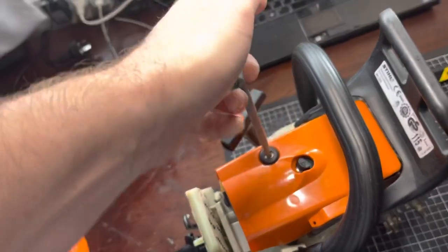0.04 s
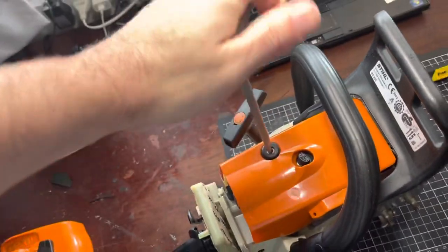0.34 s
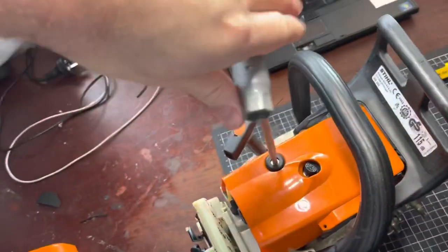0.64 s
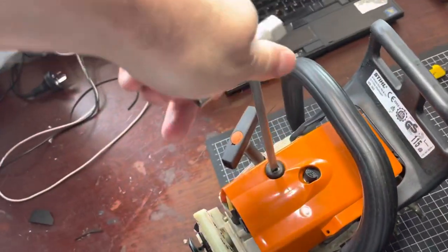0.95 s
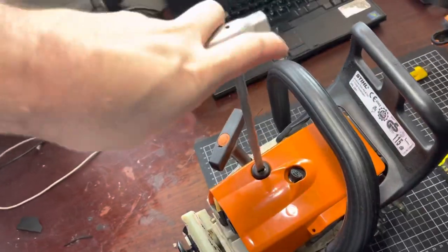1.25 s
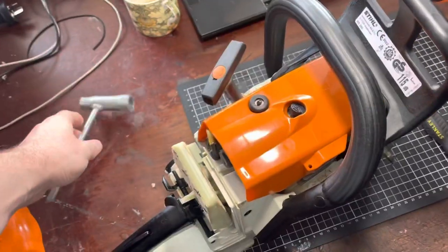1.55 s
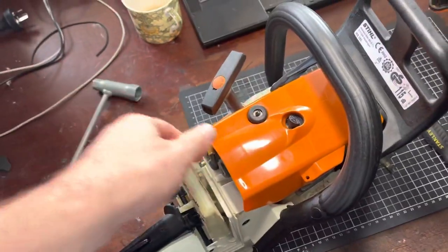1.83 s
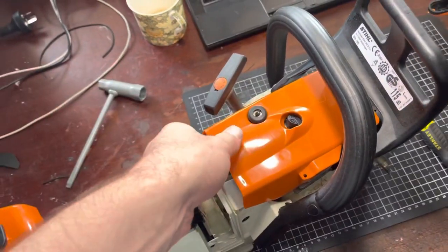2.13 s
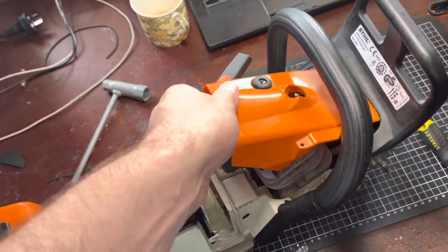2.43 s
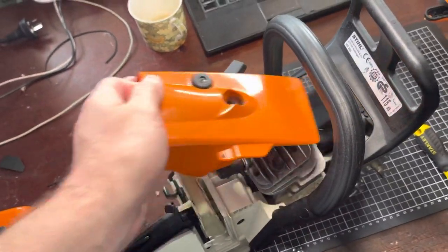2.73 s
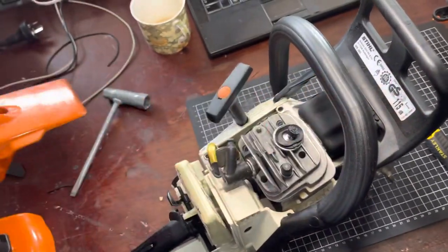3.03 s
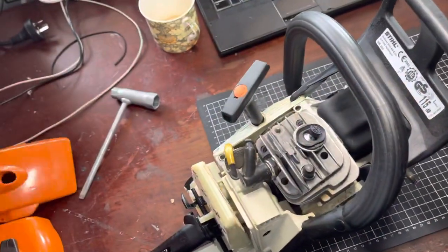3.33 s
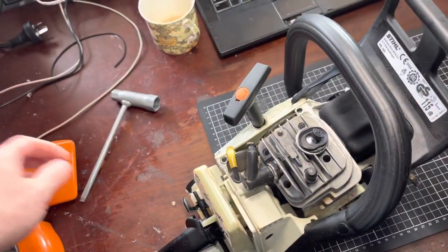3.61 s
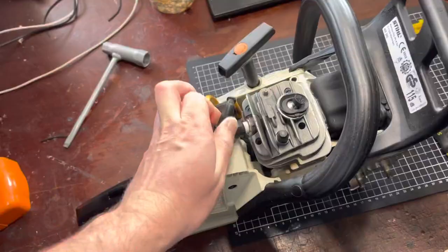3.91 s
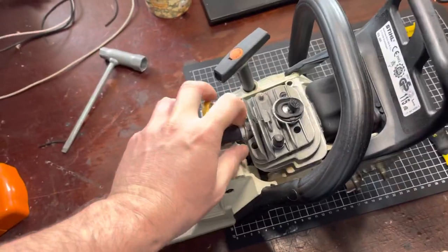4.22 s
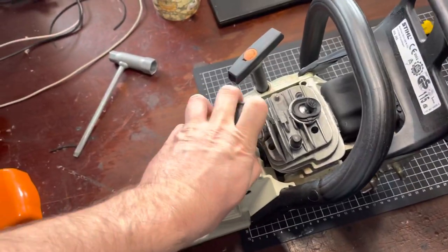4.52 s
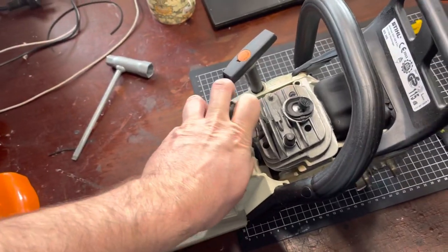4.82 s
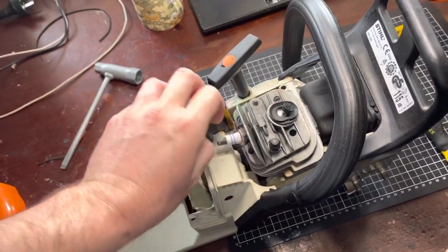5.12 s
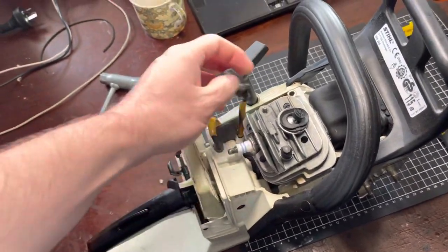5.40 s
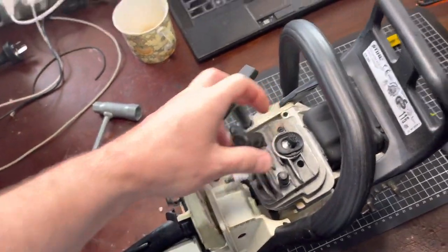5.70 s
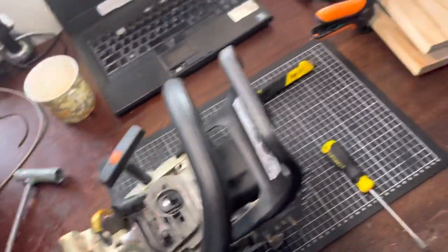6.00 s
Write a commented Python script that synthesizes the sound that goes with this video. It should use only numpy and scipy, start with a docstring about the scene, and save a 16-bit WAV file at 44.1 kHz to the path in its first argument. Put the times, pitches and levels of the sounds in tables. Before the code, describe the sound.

Close workbench handling: small tool knocks, a loud ringing wrench drop, plastic snapping loose and landing, then light clicks and rubs.

```python
"""Opening a chainsaw on a wooden bench

A steel T-wrench knocks in the cover screw, drops on the bench and rocks to rest, its tube ringing
in beating pairs. The plastic cover snaps free and is set down; fingers work a small metal part loose.
Each blow is a crack, decaying modes, a rattle and a room tail. Hands sway the saw on its mounts
and slide in tiny uneven slips, close to the microphone, over a low workshop rumble."""
import sys
import numpy as np
from scipy import signal
from scipy.fft import rfft, irfft, next_fast_len
from scipy.io import wavfile
from scipy.ndimage import uniform_filter1d

SR = 44100
rng = np.random.default_rng(int(sys.argv[2]) if len(sys.argv) > 2 else 0)


def transcribe(signal):
    """Save signal, clipped to [-1, 1], as a 16-bit WAV file at the path in sys.argv[1]."""
    frames = np.atleast_2d(signal).T
    limited = np.clip(frames, -1, 1)
    pcm = np.round(limited * 32767).astype(np.int16)
    wavfile.write(sys.argv[1], SR, pcm)


N = 271215
EDGE_HZ = 13600


def amp(db):
    """Decibels to gain."""
    return 10 ** (np.asarray(db) / 20)


def read(points, hz):
    """Interpolates a curve over log frequency."""
    f, value = np.transpose(points)
    return np.interp(np.log(hz + 1), np.log(f + 1), value)


def sides(db):
    """Stereo gains for a left-minus-right level."""
    return amp(np.array([[db], [-db]]) / 2)


def add(mix, s, sound):
    """Mixes a stereo sound in at time s."""
    part = mix[:, max(round(s * SR), 0):]
    part[:, :sound.shape[1]] += sound[:, :part.shape[1]]


def causal(gain_db):
    """Minimum-phase response: no ringing before the blow."""
    log_gain = np.log(amp(np.concatenate([gain_db, gain_db[-2:0:-1]])))
    return np.exp(np.conj(signal.hilbert(log_gain)))[:len(gain_db)]


# Left-right likeness: (frequency [Hz], correlation [0-1])
COHERENCE = [(100, 0.98), (350, 0.69), (700, 0.34), (2000, 0.32), (5000, 0.057), (9000, 0.56),
             (13000, 0.11)]

def noise(size, spectrum=None):
    """Unit-power stereo noise, nearly mono in the bass."""
    hz = np.fft.rfftfreq(size, 1 / SR)
    left, other = rfft(rng.standard_normal((2, size)))
    same = np.clip(read(COHERENCE, hz), 0, 1)
    right = same * left + np.sqrt(1 - same ** 2) * other
    colour = amp(read(spectrum, hz)) if spectrum else 1
    x = irfft(np.array([left, right]) * colour, size)
    return x / x.std()


# Room noise: (frequency [Hz], relative density [dB])
RUMBLE_SPECTRUM = [(15, -46), (25, -13.5), (41, -8.5), (60, -2.5), (76, -14.5), (121, -19.5), (153, -31),
                   (264, -32.5), (308, -34.5), (653, -41), (988, -51.5), (1210, -46.5), (1620, -54),
                   (12200, -54), (15800, -88.5), (22000, -120)]

def workshop_rumble():
    """Steady low noise of a quiet room."""
    return amp(-67) * noise(next_fast_len(N), RUMBLE_SPECTRUM)[:, :N] * sides(-1.57)


# Resting hand: (start [s], end [s], level [dB])
GRIPS = [(0, 0.727, -77.5), (0.87, 1.356, -80.5), (2.015, 2.72, -74), (3.984, 4.851, -81),
         (4.9, 5.247, -83), (5.477, 6.152, -81.5)]
# Pushes on the saw: (time [s], level [dB])
PUSHES = [(0.194, -43), (0.45, -65), (0.67, -57), (1.208, -65.5), (2.09, -57), (2.275, -42), (2.42, -86),
          (2.64, -55.5), (4.02, -55.5), (4.196, -53), (4.45, -73), (4.56, -57), (4.68, -53), (5.66, -60)]
# Skin slides: (centre [s], length [s], level [dB])
RUBS = [(0.234, 0.16, -59.5), (0.406, 0.085, -64), (0.57, 0.039, -69), (1, 0.21, -73.5), (1.17, .2, -65),
        (2.136, 0.22, -64.5), (2.303, 0.083, -55), (2.606, 0.19, -52.5), (4.001, 0.057, -70),
        (4.396, 0.059, -63), (4.523, 0.085, -66.5)]
# Sway, dull rub, bright scrape: (frequency [Hz], relative density [dB])
SWAY_SPECTRUM = [(40, -10), (60, 1.5), (90, -17), (112, -2.5), (126, 7), (150, -18), (230, -12.5),
                 (330, -22), (600, -44)]
RUB_SPECTRUM = [(100, -28.5), (250, 3), (600, -4), (1300, -4), (2400, -12.5), (4000, -25), (9000, -42)]
SCRAPE_SPECTRUM = [(1200, -20), (3000, -4), (5000, -5.5), (7000, -6), (9200, -1.5), (10300, -7),
                   (11600, -9), (13000, -29.5)]

def hands(grip_fade_s=.034, push_rise_s=.025, push_fall_s=.05, grain_db=2):
    """Hands rock the saw on its mounts; skin and plastic slide in tiny uneven slips."""
    t = np.arange(N) / SR
    grip = np.max([amp(db) * np.exp(-abs(t - np.clip(t, start, end)) / grip_fade_s)
                   for start, end, db in GRIPS], axis=0)
    push = sum(amp(db) * np.exp(-np.maximum((s - t) / push_rise_s, (t - s) / push_fall_s))
               for s, db in PUSHES)
    slide = sum(amp(db) * np.exp(-(2 * (t - s) / length) ** 2) for s, length, db in RUBS)
    slips = uniform_filter1d(rng.standard_normal(N), size=120)
    grain = amp(grain_db * slips / slips.std())
    grain /= np.sqrt(np.mean(grain ** 2))
    sway, rub, scrape = (noise(next_fast_len(N), spectrum)[:, :N]
                         for spectrum in [SWAY_SPECTRUM, RUB_SPECTRUM, SCRAPE_SPECTRUM])
    sway *= amp(6) * np.hypot(amp(10.5) * grip, push)
    rub *= amp(3) * np.hypot(grip, slide)
    scrape *= amp(4) * np.hypot(amp(-5) * grip, amp(-12.5) * slide)
    return (sway + grain * (rub + scrape)) * sides(-1.5)


# Thump, body, knock, crack and tick bands: (edge [Hz])
BAND_EDGES_HZ = [90, 180, 550, 1500, 4500, 13000]
BAND_CENTRES_HZ = np.sqrt(np.multiply(BAND_EDGES_HZ[1:], BAND_EDGES_HZ[:-1]))

def contacts(rows, thump_db, bite_db):
    """Time and five band levels per blow: weight drives the bass, hardness the treble."""
    crack_octaves, tick_octaves = np.log2(BAND_CENTRES_HZ[-2:] / BAND_CENTRES_HZ[2])
    hits = []
    for s, weight, knock, tilt in rows:
        crack = knock + tilt * crack_octaves + bite_db
        tick = max(knock + tilt * tick_octaves, weight - 36)  # soft contacts still tick faintly
        hits.append((s, weight + thump_db, weight, knock, crack, tick))
    return hits


def shape_bands(x, levels_db):
    """Equalises a blow so that its first 30 ms approach the band levels."""
    size, early = x.shape[1], round(.03 * SR)
    hz = np.fft.rfftfreq(size, 1 / SR)
    edges = np.searchsorted(hz, BAND_EDGES_HZ)
    for _ in range(2):
        power = np.mean(abs(rfft(x[:, :early], size)) ** 2, axis=0) * 2 / (size * early)
        now_db = 10 * np.log10(np.add.reduceat(power, edges)[:-1] + 1e-20)
        gain_db = np.interp(np.log(hz + 1), np.log(BAND_CENTRES_HZ), levels_db - now_db)
        x = irfft(rfft(x) * causal(gain_db))
    return x


# Room decay: (frequency [Hz], T60 [s])
ROOM_DECAY = [(100, .5), (260, 0.4), (700, 0.22), (1840, .25), (4850, 0.16), (12000, 0.12)]

def blows(hits, modes, colour, crack_t60_s, rattle_db, rattle_t60_s, fine_db, fine_t60_s, room_db):
    """Each blow: a short crack, the struck body's modes, a rattle of its parts, a room tail."""
    size, fine_count = 24576, 48
    t, out = np.arange(size) / SR, np.zeros((2, N))
    # a stiff body has many small modes besides its main ones
    fine_hz = np.geomspace(550, 12000, fine_count) * np.exp(.03 * rng.standard_normal(fine_count))
    fine = np.column_stack([fine_hz, np.full(fine_count, fine_db), fine_t60_s * (fine_hz / 2000) ** -.4])
    hz, height_db, t60 = np.vstack([modes, fine]).T[:, :, None]
    unit_peak = 2 * np.log(1000) / (t60 * SR)
    ring = unit_peak * amp(height_db - 60 * t / t60) * np.exp(2j * np.pi * hz * t)
    room_hz, room_t60 = np.transpose(ROOM_DECAY)
    bins = np.fft.rfftfreq(size, 1 / SR)
    room_bands = np.array([np.interp(np.log(bins + 1), np.log(room_hz), row)
                           for row in np.eye(len(room_hz))])
    room_fades = amp(-60 * t / room_t60[:, None]) * (1 - np.exp(-t / .005)) / np.sqrt(SR * .02)
    crack, rattle = amp(-60 * t / crack_t60_s), amp(-60 * t / rattle_t60_s)
    contact = np.hypot(crack / np.linalg.norm(crack), amp(rattle_db) * rattle / np.linalg.norm(rattle))
    body = causal(read(colour, bins))
    spread_rad = np.sqrt(1 - np.clip(read(COHERENCE, hz[:, 0]), 0, 1))
    for s, *levels_db in hits:
        # the contact point sets each mode's strength
        strength = amp(2 * rng.standard_normal(len(hz)))
        drive = strength * np.exp(1j * spread_rad * rng.standard_normal((2, len(hz))))
        drive[:, len(modes):] *= rng.standard_normal(fine_count)
        tail = (irfft(rfft(noise(size))[:, None] * room_bands) * room_fades).sum(axis=1)
        blow = contact * noise(size) + (drive @ ring).real + amp(room_db) * tail
        add(out, s, shape_bands(irfft(rfft(blow) * body), np.array(levels_db)))
    return out


# Blade knocks: (time [s], weight [dB], knock [dB], treble tilt [dB/oct])
SCREW_TURNS = [(0.111, -85, -76.5, 6.5), (0.1565, -35, -32, -3), (0.241, -51.5, -38, -11),
               (0.261, -56.5, -50.5, -2.5), (0.342, -58, -63, 0), (0.412, -54.5, -51, -7.5),
               (0.507, -65, -55.5, -18), (0.526, -40.5, -44.5, -9.5), (0.643, -79, -45.5, -2.1),
               (0.655, -42, -47, -1.5), (0.936, -65.5, -70.5, 3), (1.0566, -47.5, -45, -7.5),
               (1.152, -32.5, -49, 0.27), (1.2546, -70, -52, -15)]
# Saw body: (frequency [Hz], height over crack [dB], T60 [s])
SAW_MODES = [(133, 25.5, 0.55), (240, 15, 0.24), (310, 17, 0.17), (497, 4, 0.11), (717.5, 12.5, 0.034),
             (1123.5, 17, 0.031), (1279.3, 13, 0.024), (1620, 19.5, 0.085), (2488, 10, 0.047),
             (4192, 5, 0.027), (8890, 14, 0.013)]
# Saw response: (frequency [Hz], gain [dB])
SAW_COLOUR = [(60, -10), (125, 2.5), (185, -9), (290, -1.5), (400, -2.5), (750, -1), (930, -8.5),
              (1200, -2), (1800, -2.5), (2000, -2), (9000, 5.5)]

def screw_turns():
    """The wrench blade knocks in the screw slot and rings the saw."""
    hits = contacts(SCREW_TURNS, thump_db=-8.5, bite_db=-2)
    return amp(-1.5) * blows(hits, SAW_MODES, SAW_COLOUR, crack_t60_s=.009, rattle_db=-3,
                             rattle_t60_s=.021, fine_db=10.5, fine_t60_s=.12, room_db=2.5)


# Noise swells: (centre [s], length [s], band centre [Hz], bandwidth [Hz], level [dB])
SWELLS = [(0.157, .014, 766, 503, -38), (0.65, 0.029, 2930, 4540, -55), (2.303, .08, 6050, 8000, -49),
          (2.567, 0.077, 6700, 7200, -51), (3.306, 0.2, 6950, 8300, -65), (3.377, 0.022, 2480, 4000, -44),
          (4.436, 0.031, 2530, 1800, -51.5), (4.667, 0.015, 2760, 1410, -36.5),
          (4.7, .014, 2100, 1000, -48), (4.719, .018, 2500, 1410, -41), (4.81, .014, 476, 220, -53.5),
          (5.045, 0.068, 3400, 2000, -73.5), (5.187, 0.057, 3200, 2000, -73.5),
          (5.487, 0.049, 4120, 2010, -72), (5.591, 0.061, 3760, 890, -64.5),
          (5.68, 0.066, 3490, 902, -70.5), (5.764, 0.065, 4696, 4100, -73),
          (6.137, 0.08, 7450, 8000, -57.5)]

def noise_swells(grain_db=3.5):
    """Short swells of grainy band noise: scuffs, a dull knock and two faint breathy hisses."""
    out = np.zeros((2, N))
    for s, length, hz, width, db in SWELLS:
        size = round(length * SR)
        edges_hz = np.clip([hz - width / 2, hz + width / 2], 200, EDGE_HZ)
        band = signal.butter(2, edges_hz, "band", fs=SR, output="sos")
        flicker = uniform_filter1d(rng.standard_normal(size), size=60)
        x = signal.sosfilt(band, noise(size) * amp(grain_db * flicker / flicker.std()))
        add(out, s - length / 2, amp(db) * x / x.std() * np.sqrt(np.hanning(size)))
    return out


# Wrench on bench: (time [s], weight [dB], knock [dB], treble tilt [dB/oct])
WRENCH_BOUNCES = [(1.4948, -12, -18.5, -14.5), (1.582, -16, -19, -5), (1.589, -28, -23.5, -8),
                  (1.6035, -31, -18, -7.5), (1.627, -25, -33, -2.5), (1.644, -27, -26.5, -6.5),
                  (1.6643, -45, -28, 3), (1.6685, -25.5, -32, -3.5), (1.705, -32.5, -37.5, -2),
                  (1.749, -43, -32.5, -1.5), (1.7723, -31, -36, -1), (1.7855, -42.5, -33, -1),
                  (2.015, -62, -61, -6)]
# Bench top: (frequency [Hz], height over crack [dB], T60 [s])
BENCH_MODES = [(215, 7.5, 0.18), (314.7, 20, 0.28), (359.8, 17, 0.057), (407.1, 13, 0.22), (478, 11, 0.073),
               (561, 5.7, 0.035), (696.2, 4.5, 0.32), (749, 2.5, 0.29), (985.5, 10, 0.26), (1206, 2, 0.71),
               (1230, 10, .15), (1788, 18, 0.11), (2360, 2.5, 0.026), (4940, 14, 0.012), (11700, 14, 0.004)]
# Bench response: (frequency [Hz], gain [dB])
BENCH_COLOUR = [(60, -1), (170, -0.5), (215, 1.5), (750, -0.5), (1200, -1), (1450, 0), (2450, 0),
                (3100, -9), (6500, -12.5), (9000, -10.5)]

def wrench_drop(rock_start_s=1.83, first_gap_s=.021, gap_ratio=.985):
    """The wrench bounces, then rocks: each rock sooner, weaker and duller."""
    k = np.arange(8)
    times = rock_start_s + first_gap_s * (1 - gap_ratio ** k) / (1 - gap_ratio)
    weight_db, knock_db, tilt = -35 - 2.27 * k, -38.5 - 1.36 * k, -5 - .64 * k
    rocks = contacts(zip(times, weight_db, knock_db, tilt), thump_db=-27, bite_db=9.5)
    bounces = contacts(WRENCH_BOUNCES, thump_db=-22, bite_db=5)
    return sides(.8) * blows(bounces + rocks, BENCH_MODES, BENCH_COLOUR, crack_t60_s=.013, rattle_db=-3,
                             rattle_t60_s=.07, fine_db=7, fine_t60_s=.12, room_db=-1)


# Tube modes: (frequency [Hz])
TUBE_HZ = [4131, 4494, 5469, 7508, 8988, 11308]
# Per mode: (rocking T60 [s], resting T60 [s], pan [dB], left lead [rad])
TUBE_MODES = [(0.67, 1, 1.5, -1.1), (0.87, 0.52, 0, -1.5), (1.2, 0.59, 1, -1.7), (.68, 0.98, 9, 1.5),
              (6, 0.25, 0.5, -0.48), (0.37, 1, -1, 1.5)]
# Twin of each mode: (offset [Hz], relative level [dB])
TUBE_TWINS = [(5, -25), (10, -16), (8, -20), (-15.5, -11), (-18, -20), (22, -16)]
# Twin level; the beating deepens as the ring fades, then eases: (time [s], gain [dB])
TWIN_GAIN = [(1.85, 0), (2.13, 9), (2.4, 4)]
# Blows on the tube: (time [s], level of each of six modes [dB])
TUBE_STRIKES = [(1.4915, -63, -66.5, -75.5, -72, -52, -76), (1.583, -48.5, -37, -57.5, -47, -57.5, -32),
                (1.6632, -46, -33.5, -39.5, -19.5, -33.5, -13.5),
                (1.7727, -35.5, -33, -43.5, -12.5, -25, -52)]

def wrench_ring(rest_s=1.881):
    """The out-of-round steel tube rings in beating pairs; blows add energy, damping changes at rest."""
    t, out = np.arange(N) / SR, np.zeros((2, N))
    since_last = t - TUBE_STRIKES[-1][0]  # each pair leaves the last blow in phase
    for k, (rocking_t60, resting_t60, pan_db, lead) in enumerate(TUBE_MODES):
        lost_db = 60 * np.cumsum(np.where(t < rest_s, 1 / rocking_t60, 1 / resting_t60)) / SR
        energy = np.zeros(N)
        for s, *levels_db in TUBE_STRIKES:
            at = round(s * SR)
            energy[at:] += amp(levels_db[k] - lost_db[at:] + lost_db[at]) ** 2
        phase = 2 * np.pi * TUBE_HZ[k] * since_last + np.array([[lead], [0]])
        offset_hz, twin_db = TUBE_TWINS[k]
        twin_gain = amp(twin_db + np.interp(t, *np.transpose(TWIN_GAIN)))
        twin = twin_gain * np.sin(phase + 2 * np.pi * offset_hz * since_last)
        out += np.sqrt(energy) * (np.sin(phase) * sides(pan_db) + twin)
    return out


def deep_thump(time_s=1.6685, width_s=.00026):
    """A brief, deep thump under the loudest clash."""
    t = np.arange(N) / SR - time_s
    pulse = amp(-15) * np.exp(-(t / width_s) ** 2 / 2)
    return signal.lfilter(*signal.butter(1, 70, "high", fs=SR), pulse)


# Catches letting go: (time [s], weight [dB], knock [dB], treble tilt [dB/oct])
PLASTIC_SNAPS = [(2.217, -67, -50.5, 1), (2.2275, -46.5, -38, -2), (2.238, -64, -70.5, 14),
                 (2.243, -40.5, -40.5, 2.5), (2.277, -51, -44, -4.5), (2.3155, -43, -41.5, -1.5),
                 (2.334, -49.5, -37.5, -8.5), (2.4467, -55.5, -49, -10.5), (2.478, -54.5, -57.5, -5.5),
                 (2.5535, -64, -49.5, -1), (2.5974, -56, -46, 1.5), (2.6298, -53, -41.5, -1.5),
                 (2.6862, -58.5, -52, -6), (3.148, -71, -72.5, 1.5), (3.9885, -84, -64.5, -2.5),
                 (4.4265, -79, -56, -4), (4.439, -69, -66, -4), (4.5916, -51, -65, 2),
                 (4.6639, -60.5, -54.5, 2), (4.7148, -51.5, -51, 4), (4.809, -59.5, -68.5, -5.5),
                 (6.103, -64, -63.5, -9.5)]
# Housing: (frequency [Hz], height over crack [dB], T60 [s])
SHELL_MODES = [(120.06, 31.3, 0.52), (249.4, 2.47, 0.25), (655, 5.4, 0.074), (729.5, 19, 0.053),
               (919, 3.9, 0.19), (1298, 19, 0.2), (1440, 1, 0.0057), (2640, 4.4, 0.019), (3410, 12, 0.013),
               (5270, 1.8, 0.033), (9750, 15.7, 0.066), (12900, 5.8, 0.055)]
# Housing response: (frequency [Hz], gain [dB])
SHELL_COLOUR = [(60, -3.5), (250, 3.5), (430, -3.5), (720, -9), (1300, -1.5), (1900, 3.5), (2600, 6),
                (3500, 4), (7000, -1), (9300, 5.5)]

def plastic_snaps():
    """Plastic catches and snaps past the housing."""
    hits = contacts(PLASTIC_SNAPS, thump_db=-3, bite_db=3.5)
    return blows(hits, SHELL_MODES, SHELL_COLOUR, crack_t60_s=.014, rattle_db=0,
                 rattle_t60_s=.11, fine_db=11, fine_t60_s=.08, room_db=-2)


# Cover on bench: (time [s], weight [dB], knock [dB], treble tilt [dB/oct])
COVER_BOUNCES = [(3.2435, -20.5, -27, -18.5), (3.327, -34.5, -43, -10.5), (3.3828, -28, -26.5, -6.5),
                 (3.39, -23, -33, -7.5), (3.4138, -34.5, -25.5, -5), (3.45, -31, -37, -8.5),
                 (3.475, -49.5, -51, -7)]
# Loose cover: (frequency [Hz], height over crack [dB], T60 [s])
COVER_MODES = [(130.6, 16.84, 0.54), (234, 11.4, 0.119), (305, 12.3, 0.17), (371, 14.5, 0.14),
               (407, 8.8, 0.067), (514, 5.6, 0.017), (615, 9.8, 0.074), (655, 5.5, 0.051),
               (789, 7.8, 0.053), (838, 4.8, 0.041), (1007, 5.3, 0.16), (1326, 9.9, 0.3), (1840, 3, 0.23),
               (2210, 11, 0.049)]
# Cover response: (frequency [Hz], gain [dB])
COVER_COLOUR = [(60, -8), (260, -4.5), (350, 1.5), (470, 0), (550, 3), (980, 2), (1130, -4), (2400, -10),
                (3200, -11), (4200, -9), (6000, -7), (9000, -6)]

def cover_landing():
    """The loose cover clatters onto the bench."""
    hits = contacts(COVER_BOUNCES, thump_db=-27.5, bite_db=4.5)
    return sides(1.2) * blows(hits, COVER_MODES, COVER_COLOUR, crack_t60_s=.025, rattle_db=-3,
                              rattle_t60_s=.12, fine_db=9, fine_t60_s=.1, room_db=-3)


# Fingertip contacts: (time [s], weight [dB], knock [dB], treble tilt [dB/oct])
FINGER_PATS = [(3.951, -56.5, -64, -4), (3.972, -87, -73, 2), (4.023, -70, -64.5, -4.5),
               (4.362, -59, -63, -2), (4.39, -56.5, -63.5, -6), (4.511, -61, -64.5, -6),
               (4.635, -60.5, -62.5, -1), (5.435, -67, -91, 4)]

def finger_pats():
    """Fingertips land on the engine and shift their grip."""
    hits = contacts(FINGER_PATS, thump_db=.5, bite_db=-3.5)
    return amp(-1) * blows(hits, SAW_MODES, SHELL_COLOUR, crack_t60_s=.04, rattle_db=5,
                           rattle_t60_s=.13, fine_db=3, fine_t60_s=.08, room_db=3)


# Nudges: (time [s], weight [dB], knock [dB], treble tilt [dB/oct])
METAL_TICKS = [(4.1391, -82.5, -71.5, 5.5), (4.211, -105, -89.5, 10), (4.222, -68, -80, 7),
               (5.4841, -61.5, -72, .5), (5.574, -76, -92.5, 11)]
# Metal part: (frequency [Hz], height over crack [dB], T60 [s])
METAL_MODES = [(136.5, 30.3, 0.6), (3640, 9.2, 0.065), (4550, 31.4, 0.11), (6045, 35, 0.091),
               (7960, 7, 0.13), (8820, 27, 0.08), (8900, 12, 0.05), (9900, 16, 0.036)]

def metal_ticks():
    """A small metal part on the engine is nudged and rings briefly."""
    hits = contacts(METAL_TICKS, thump_db=6, bite_db=-5.5)
    return sides(1) * blows(hits, METAL_MODES, SHELL_COLOUR, crack_t60_s=.024, rattle_db=-2,
                            rattle_t60_s=.15, fine_db=14, fine_t60_s=.06, room_db=-1)


# Phase between ports: (frequency [Hz], left lead [rad])
PORT_LEAD = [(50, 0), (130, .2), (380, .55), (750, .7), (1500, .4), (3000, .8), (5500, .4), (9000, -.9),
             (13000, -.6)]

def mic_ports(x):
    """Sound from the bench reaches the two microphone ports slightly out of phase."""
    size = next_fast_len(N + SR)
    lead = read(PORT_LEAD, np.fft.rfftfreq(size, 1 / SR))
    return irfft(rfft(x, size) * np.exp(.5j * np.array([lead, -lead])), size)[:, :N]


def scene():
    """All the handling over the workshop rumble."""
    handling = hands() + screw_turns() + noise_swells() + wrench_drop()
    handling += plastic_snaps() + cover_landing() + finger_pats() + metal_ticks()
    return workshop_rumble() + mic_ports(handling) + wrench_ring() + deep_thump()


# Microphone response: (frequency [Hz], gain [dB])
MIC_COLOUR = [(20, -11), (60, 1.5), (9500, -0.5), (10300, -12.5), (11200, 2.5), (12000, -8), (12700, -16.5),
              (13500, -27)]

def record(dry):
    """Microphone colour, soft overload on the hardest blows, steep low-pass."""
    hz = np.fft.rfftfreq(2048, 1 / SR)
    mic_impulse = irfft(causal(read(MIC_COLOUR, hz)))
    coloured = signal.oaconvolve(dry, mic_impulse[None], axes=1)[:, :N]
    rounded = coloured / (1 + (coloured / .88) ** 8) ** (1 / 8)
    lowpass = signal.firwin(255, EDGE_HZ, window=("kaiser", 9), fs=SR)
    return signal.oaconvolve(rounded, lowpass[None], "same")


dry = scene()
out = record(dry)
transcribe(out)
```